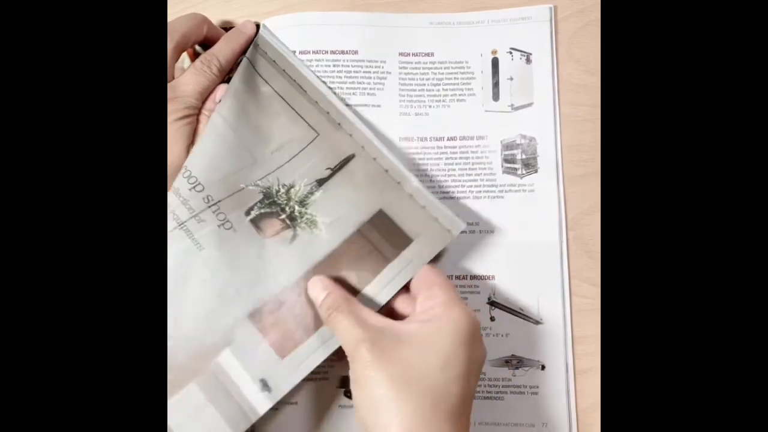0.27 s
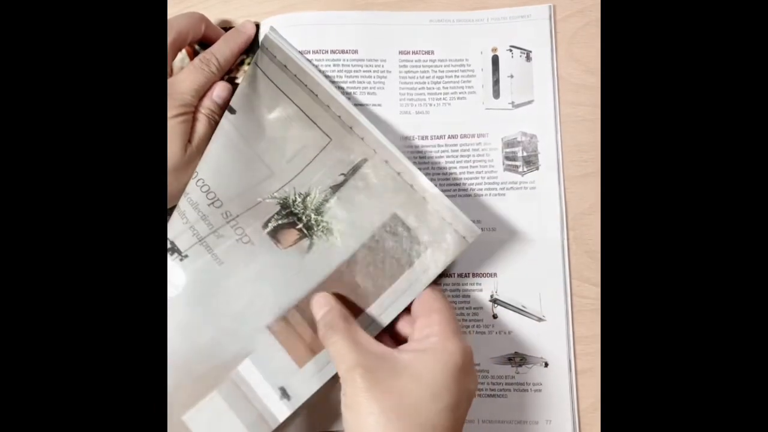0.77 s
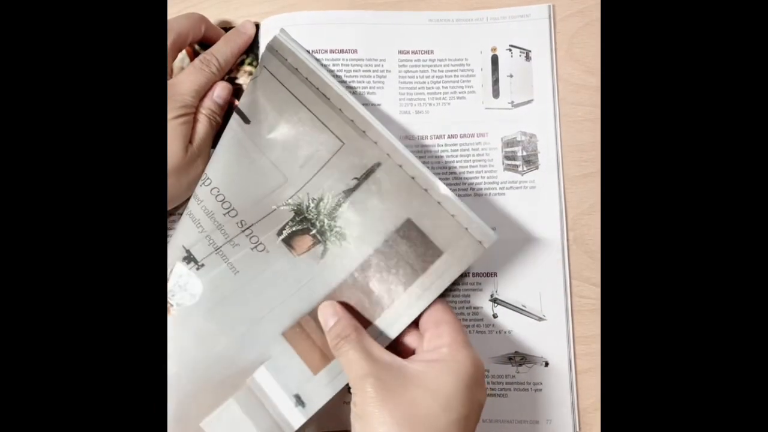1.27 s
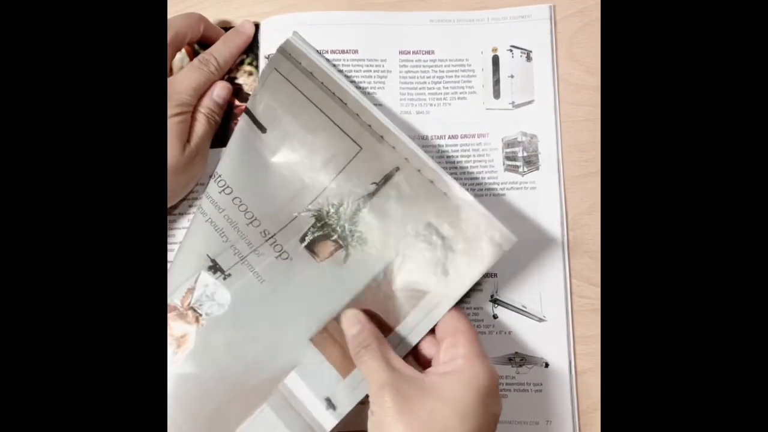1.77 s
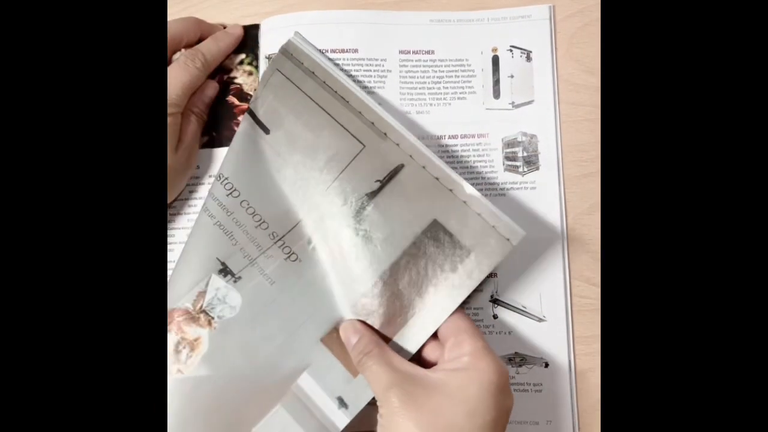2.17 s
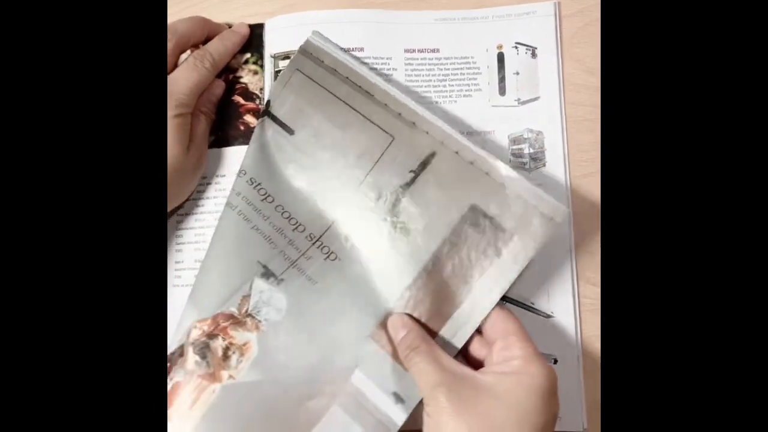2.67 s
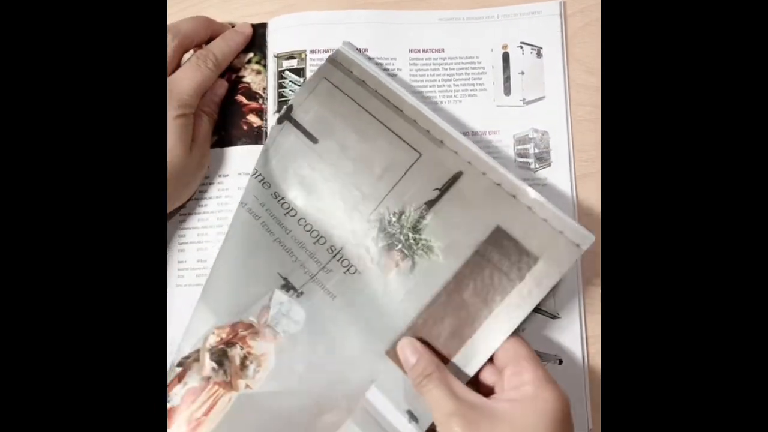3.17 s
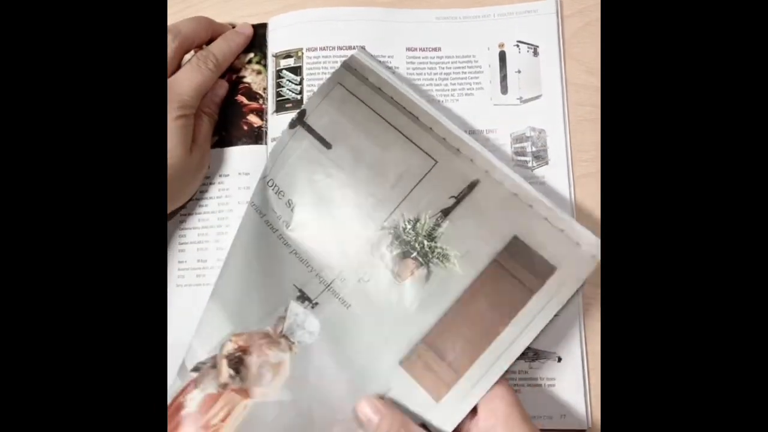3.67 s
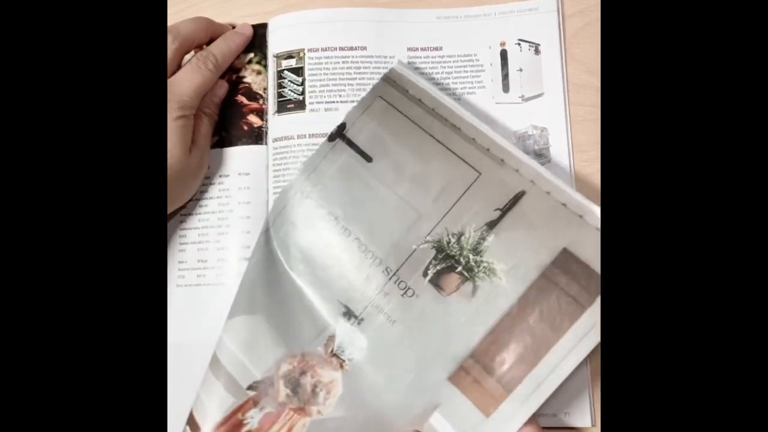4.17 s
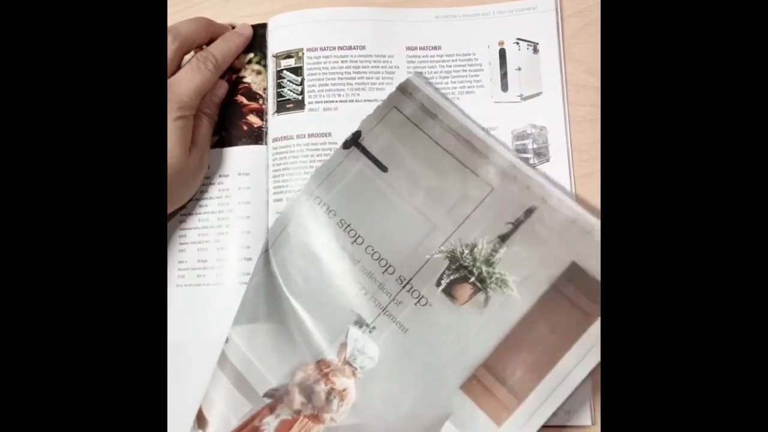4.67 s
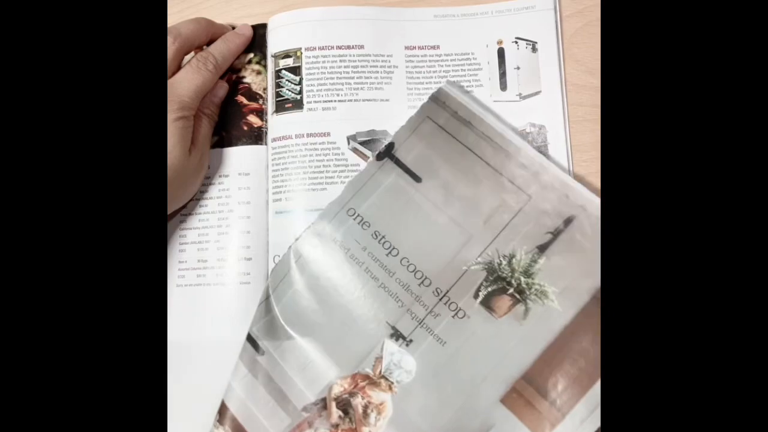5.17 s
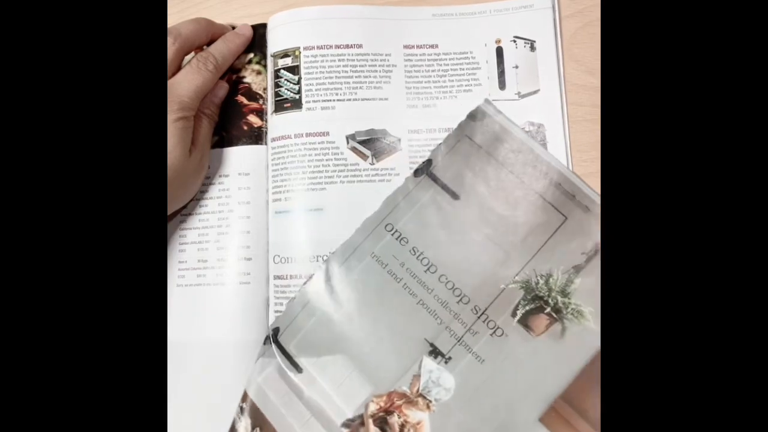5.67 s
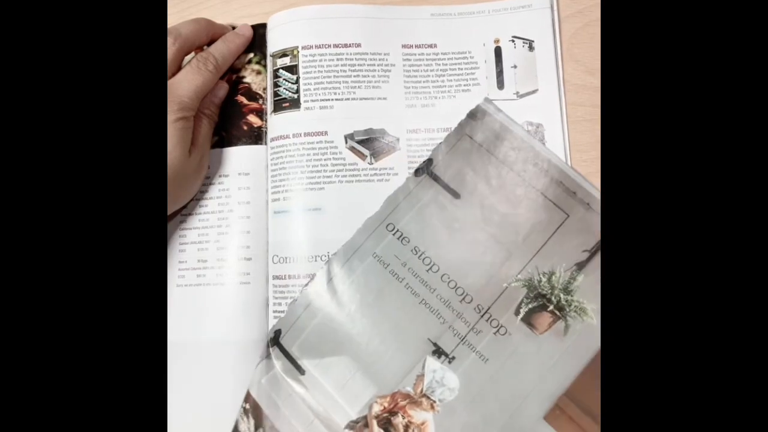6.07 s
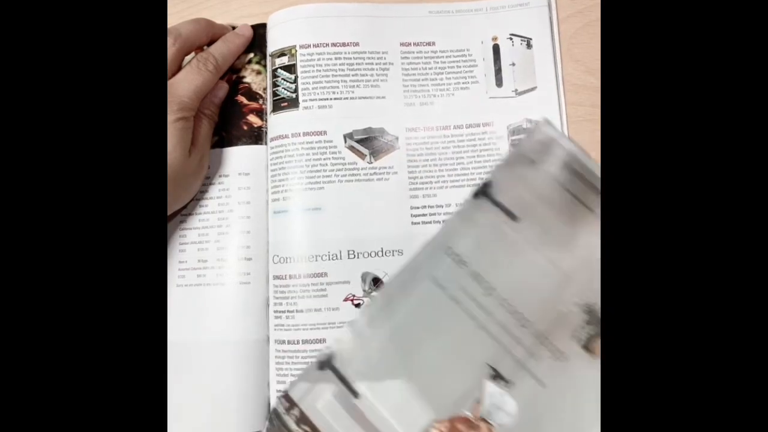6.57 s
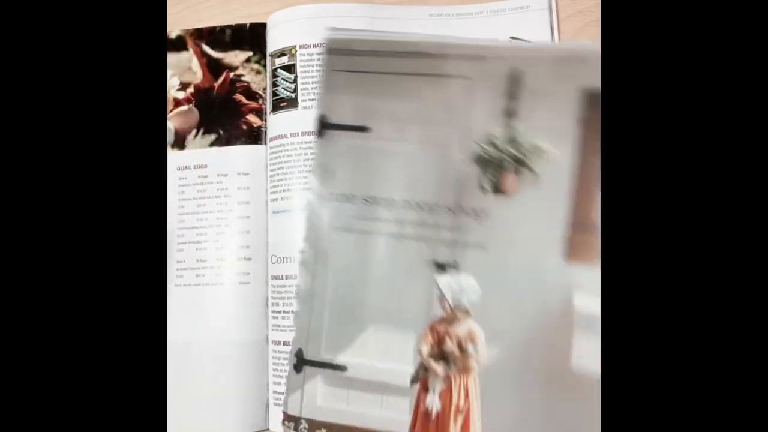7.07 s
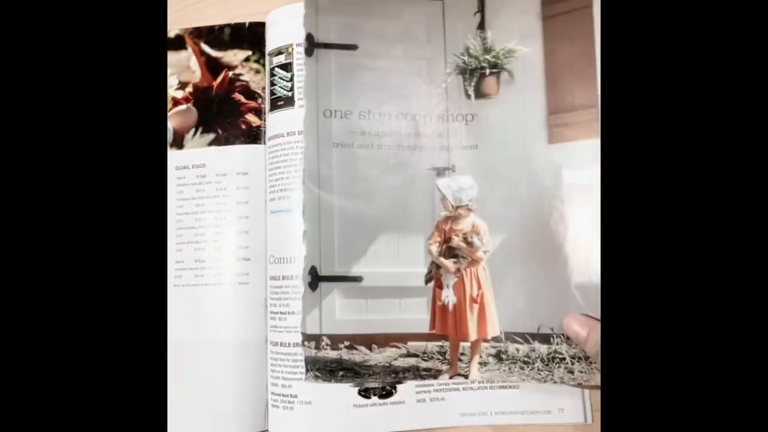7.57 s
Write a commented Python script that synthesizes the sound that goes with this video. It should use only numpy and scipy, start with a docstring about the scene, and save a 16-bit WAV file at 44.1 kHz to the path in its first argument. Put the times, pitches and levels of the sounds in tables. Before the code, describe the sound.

In a small quiet room, very close to the microphone, hands slowly tear a glossy page from a magazine on a wooden table. Short crackling rips come about twice a second, with dry snaps, ticks of buckling paper, soft flaps and grainy rubbing in between. Pulls start light and grow louder and brighter. The last rip frees the page, which then lands and glides to rest with a hollow papery brush.

```python
"""Hands bend, shift and nudge a magazine on a wooden table in a small, quiet room, heard close.
Then a glossy page is torn out along the spine in short pulls: each breaks a run of fibres, built from
crackles of tiny ringing bursts, with stronger snaps of whole bundles. Between pulls the page buckles with
ticks and low flaps, and slides over its neighbours with a grainy rub and hiss.
At last the freed page is laid down and glides to rest as a hollow, papery brush."""
import sys
import numpy as np
from scipy import signal
from scipy.fft import rfft, irfft
from scipy.io import wavfile
from scipy.ndimage import uniform_filter1d, map_coordinates

SR = 44100
rng = np.random.default_rng(int(sys.argv[2]) if len(sys.argv) > 2 else 0)


def store_pcm(level_fs):
    """Save levels as 16-bit WAV."""
    pcm = np.round(np.clip(level_fs, -1, 1) * 32767).astype(np.int16)
    wavfile.write(sys.argv[1], SR, np.atleast_2d(pcm).T)


N = 344862
TIME = np.arange(N) / SR

# The pulls along the spine. Each row: start in seconds, end in seconds, force in dB, swell from the middle
# to the end in dB, treble in dB, body of the sheet in dB; all levels before the trims of each layer.
PULLS = [(0.369, 0.499, -42.5, -1.5, 4, 4), (0.815, 0.95, -39.5, -1, 4, -2.5),
         (1.411, 1.526, -36.5, -4.5, -5, 2), (1.553, 1.595, -38, -7, -9, 3), (2.15, 2.246, -37, 4, -8, 5.5),
         (2.258, 2.345, -38, -3, 4, 8), (2.862, 3.072, -34, 2, 5, 2.5), (3.265, 3.412, -36, 9.5, 2, 2),
         (3.622, 3.748, -26.5, -1, 6, -3), (3.967, 4.079, -27, 1, 8.5, -3),
         (4.268, 4.373, -30, 5.5, 4.5, -2), (4.585, 4.743, -28.5, -0.5, 3, -1.5),
         (4.927, 5.073, -33, -6, 0.5, -1), (5.202, 5.34, -30, 9, 2.5, -4), (5.478, 5.577, -28, 6, 7.5, -2),
         (5.844, 5.931, -39.5, 5, 4.5, -7), (6.102, 6.234, -23.5, -3, 6, 3.5),
         (6.286, 6.329, -36.5, -10, -6, 0), (6.412, 6.53, -27, 14.5, 5, 3.5)]
# The sheet buckling as it is bent or put down. Each row: start in seconds, tick peak in dB and
# flap peak in dB, both before trim.
BUCKLE_EVENTS = [(0.071, -28, -54), (0.25, -46, -55), (0.6489, -28, -50.5), (0.776, -33, -51),
                 (1.0613, -33.5, -45), (1.1363, -25, -45.5), (1.694, -22.5, -49), (1.967, -52, -46),
                 (2.105, -22.5, -52.5), (2.717, -23.5, -47.5), (3.1406, -22, -48.5), (3.5, -24, -45.5),
                 (3.605, -26.5, -49), (3.8239, -21, -42.5), (3.909, -29, -45), (4.1697, -19.5, -41),
                 (4.4485, -22, -49.5), (4.7967, -23, -46), (4.8983, -24.5, -42), (5.1189, -25.5, -50.5),
                 (5.2054, -19, -39.5), (5.391, -23.5, -50.5), (5.466, -22.5, -41), (5.622, -26, -51.5),
                 (5.9311, -22.5, -40.5), (6.063, -29, -44), (6.095, -25, -44), (6.4078, -20.5, -36),
                 (6.592, -48, -42), (6.643, -49, -48), (6.722, -52, -49), (6.8449, -30, -39),
                 (7.289, -35, -43.5), (7.727, -42, -44)]
# Bright spectrum of breaking fibres. Each row: frequency in Hz, relative level in dB.
TEAR_COLOUR = [(150, -30), (500, -20.5), (950, -16), (1400, -2.5), (1900, -3), (2800, 0), (4400, -1),
               (7500, -2.5), (11500, -2.5), (16000, -10)]
# Low resonances of the whole shaken sheet. Each row: frequency in Hz, relative level in dB.
SHEET_COLOUR = [(150, -11), (370, 5), (490, -0.5), (680, 2), (1000, -16), (2000, -16)]

SLACK_S, CORNER_S = 2.7, 6  # the page hangs slack between these times; before and after, it is taut
SLIDE_ATTACK_S, SLIDE_RELEASE_S = 0.011, 0.028
TOP_HZ = 16000  # top of the spot tints and of the final low-pass


def undb(db):
    """Amplitude factor of a level in dB."""
    return 10 ** (np.asarray(db) / 20)


def unit(x):
    """Scale to rms 1."""
    return x / np.sqrt(np.mean(x ** 2) + 1e-18)


def add(out, s, sound):
    """Mix a sound in at s seconds."""
    i = max(int(s * SR), 0)
    out[i:i + len(sound)] += sound[:len(out) - i]


def peaking(x, db, size):
    """Scale so that the loudest stretch of size samples has this rms level."""
    return x * undb(db) / np.sqrt(uniform_filter1d(x ** 2, size=size).max())


def colour(x, points, size=2048):
    """Minimum-phase filter of unit energy through (Hz, dB) points."""
    hz, db = np.transpose(points)
    grid = np.maximum(np.fft.rfftfreq(size, 1 / SR), 1)
    cepstrum = irfft(np.log(undb(np.interp(np.log(grid), np.log(hz), db))))
    # folding the cepstrum forward makes the filter causal
    cepstrum[1:size // 2] *= 2
    cepstrum[size // 2 + 1:] = 0
    response = irfft(np.exp(rfft(cepstrum)))
    return signal.fftconvolve(x, response / np.linalg.norm(response))[:len(x)]


def tint(x, depth_db, count=22):
    """Random peaks and dips above the bass, since every spot on the sheet favours other frequencies."""
    hz = np.geomspace(700, TOP_HZ, count)
    levels_db = np.append(0, depth_db * rng.standard_normal(count - 1))
    return colour(x, np.column_stack([hz, levels_db]))


def walk(rate):
    """Random drift in straight lines between normal draws, rate of them a second."""
    knots = rng.standard_normal(N // 20)
    return np.interp(TIME * rate, np.arange(len(knots)), knots)


def ring(t60, rise_s=.0001, size=4096):
    """The crowded modes of a struck sheet: noise that builds up, then falls 60 dB in t60 seconds; unit energy."""
    t = np.arange(size) / SR
    rise = np.minimum(t / rise_s, 1) ** 2
    decay = np.exp(-np.log(1000) * np.maximum(t - rise_s, 0) / t60)
    burst = rng.standard_normal(size) * decay * rise
    return burst / np.linalg.norm(burst)


def crackle(rate, spread_db, t60, tint_db, count=60, size=1024):
    """Tiny breaks of uneven size, rate a second at random moments; their place and colour wander over the sheet."""
    spots = [tint(ring(t60, size=size), tint_db) for _ in range(count)]
    place = 5 * rng.random(N) + 14 * walk(14)
    sizes = undb(spread_db * np.clip(rng.standard_normal(N), -2, 2))
    out = np.zeros(N)
    for i in np.flatnonzero(rng.random(N) < rate / SR):
        add(out, TIME[i], sizes[i] * spots[int(place[i]) % count])
    return unit(out)


def crack(t60, rise_s, flutter_db, flutter_t60):
    """A quick avalanche of breaks and the weaker flutter it sends through the sheet."""
    return ring(t60, rise_s) + undb(flutter_db) * ring(flutter_t60, 2 * rise_s)


def taut(x, hz=4550, ring_db=-1):
    """A short stretch of page held taut between hand and spine adds a broad resonance."""
    return x + undb(ring_db) * signal.lfilter(*signal.iirpeak(hz, 3, fs=SR), x)


def freed_area():
    """Gain of the low body, rising steadily with time as the page comes free; 1 at mid-scene."""
    growth_db_per_s = 1.7
    return undb(growth_db_per_s * (TIME - TIME.mean()))


def room_air(level_db=-65.5):
    """Faint steady air of the room: noise filtered towards the lows."""
    # Each row: frequency in Hz, relative level in dB.
    air_colour = [(20, -16), (110, -22), (390, -12), (1900, -28.5), (16000, -50)]
    return undb(level_db) * colour(rng.standard_normal(N), air_colour, size=8192)


def room(x, wet_db=-17, delay_s=0.0046, treble_db=-7):
    """The walls answer with a short, slightly dull tail of decaying noise."""
    tail = ring(t60=.25, size=22050)
    tail = colour(tail, [(4000, 0), (14000, treble_db)])
    out = x.copy()
    add(out, delay_s, undb(wet_db) * signal.fftconvolve(x, tail)[:N])
    return out


def table_echo(x, lag_s=0.000974, echo_db=-10):
    """The table top mirrors the paper, a little dulled; the lag drifts at random and shifts the comb notches."""
    late = lag_s * (1 + .06 * walk(4))
    echo = signal.sosfiltfilt(signal.butter(1, 4500, fs=SR, output="sos"), x)
    return x + undb(echo_db) * map_coordinates(echo, [(TIME - late) * SR], order=3)


def table_handling(paper, nudge_db=0.0, rumble_db=-75, tug_db=-40, hz=54, swell_s=0.0096):
    """Nudges thud softly as swelling, dying low tones; a rumble grows with paper loudness and freed area."""
    # Hands nudging the magazine on the table. Each row: start in seconds, level in dB.
    nudges = [(0.208, -47), (1.909, -33.5), (1.954, -31.5), (2.286, -49), (2.462, -45), (3.916, -44),
              (6.464, -38)]
    # Low spectrum of thud noise and rumble. Each row: frequency in Hz, relative level in dB.
    handling_colour = [(25, -28), (52, 12.5), (130, 14.5), (400, -22)]
    out = np.zeros(N)
    t = TIME[:SR // 4]
    swell = t / swell_s * np.exp(1 - t / swell_s)  # reaches 1 at swell_s
    for s, db in nudges:
        grit = colour(rng.standard_normal(len(t)), handling_colour)
        thud = np.sin(2 * np.pi * hz * t) + 0.14 * grit
        add(out, s, undb(db + nudge_db) * thud * swell)
    tug = np.sqrt(np.abs(uniform_filter1d(np.abs(paper), size=8000)))
    rumble = colour(rng.standard_normal(N), handling_colour, size=8192)
    return out + rumble * (undb(rumble_db) + undb(tug_db) * tug * freed_area())


def gliding():
    """The whole loose sheet lands and brushes over the magazine: a coloured crackle under a drawn level."""
    # The landing and gliding to rest. Each row: time in seconds, level in dB.
    glide_level = [(7.289, -39), (7.34, -52), (7.46, -41), (7.55, -49), (7.82, -58.5)]
    # Hollow, papery spectrum. Each row: frequency in Hz, relative level in dB.
    glide_colour = [(230, -20), (400, 2.5), (520, -4), (770, 0), (920, -7.5), (1800, -11.5), (3000, -17),
                    (9000, -31)]
    brush = colour(crackle(rate=800, spread_db=2.5, t60=0.024, tint_db=2.2), glide_colour)
    return brush * undb(np.interp(TIME, *np.transpose(glide_level), left=-np.inf))


def stroke(start, end):
    """Envelope of one movement of the page: it speeds up, holds and dies away."""
    attack = np.clip((TIME - start) / SLIDE_ATTACK_S, 0, 1)
    return attack * np.exp(-np.clip((TIME - end) / SLIDE_RELEASE_S, 0, 20))


def movements():
    """Slides, drags and settling move the page: (start s, end s, rub dB, hiss dB), levels before trim."""
    # The hand shifts the page over its neighbours.
    # Each row: start in seconds, end in seconds, rub in dB, hiss in dB; both before trim.
    slides = [(0.18, 0.26, -73, -54.5), (1.67, 1.73, -49, -55), (1.84, 1.97, -52, -57.5),
              (2.3, 2.37, -51.5, -61), (2.49, 2.65, -52.5, -54), (2.745, 2.8, -50, -52),
              (3.16, 3.27, -50.5, -56), (3.9, 3.95, -50, -44.5), (4.19, 4.27, -45.5, -41),
              (4.79, 4.84, -49.5, -43.5), (4.9, 4.94, -44, -45), (5.78, 5.85, -51.5, -51.5),
              (6.285, 6.33, -37.5, -44.5), (6.74, 6.8, -53, -51), (6.92, 7.25, -65.5, -55)]
    drag_rub_db, drag_hiss_db = -17.5, -16  # a pull drags the page along; relative to the pull
    settle_rub_db, settle_hiss_db = -4, -9  # a buckled page settles; relative to its flap
    drags = [(start, end, db + body_db + drag_rub_db, db + drag_hiss_db)
             for start, end, db, _, _, body_db in PULLS]
    settles = [(s, s + SLIDE_ATTACK_S, flap_db + settle_rub_db, flap_db + settle_hiss_db)
               for s, _, flap_db in BUCKLE_EVENTS]
    return list(slides) + drags + settles


def sliding(rub_db=-2.0, hiss_db=-7.0, ticks_db=-4, catch_db=3.0, waver_db=-2.5):
    """Paper on paper catches and slips: a crinkly rub, a fine hiss and stray edge ticks of wavering level."""
    # Low, crinkly rub. Each row: frequency in Hz, relative level in dB.
    rub_colour = [(150, -12), (370, 0.5), (520, -5), (1000, -15), (1900, -9), (3000, -19), (7000, -46.5)]
    # Fine hiss. Each row: frequency in Hz, relative level in dB.
    hiss_colour = [(600, -21), (1500, 2), (2800, -3), (5000, -1), (16000, -12.5)]
    # the page is never quite still in the hand: a constant floor, before trim
    held_rub_db, held_hiss_db = -77, -59
    rub_gain, hiss_gain = undb(held_rub_db), undb(held_hiss_db)
    for start, end, rub_level, hiss_level in movements():
        speed = stroke(start, end)
        rub_gain = np.maximum(rub_gain, speed * undb(rub_level))
        hiss_gain = np.maximum(hiss_gain, speed * undb(hiss_level))
    catch = undb(catch_db * walk(40) + waver_db * walk(6.4))
    rub = colour(crackle(rate=500, spread_db=4.0, t60=0.018, tint_db=2), rub_colour)
    edge_ticks = crackle(rate=110, spread_db=7, t60=.003, tint_db=2.5)
    hiss = colour(rng.standard_normal(N) + undb(ticks_db) * edge_ticks, hiss_colour)
    return catch * (rub * rub_gain * undb(rub_db) + hiss * hiss_gain * undb(hiss_db))


def stray_ticks(gain_db=-9.5):
    """Single fibres and page edges catch and let go as short bursts, too light to shake the sheet."""
    # Each row: start in seconds, peak in dB before trim.
    releases = [(0.081, -36.5), (0.798, -39), (1.106, -31), (1.3247, -33), (1.364, -27.5), (1.8117, -30.5),
                (1.866, -32), (2.455, -31.5), (2.848, -30), (2.868, -24), (3.2617, -24.5), (3.438, -23),
                (4.5816, -13.5), (5.07, -23), (5.1407, -28.5), (5.453, -26.5), (6.756, -30), (7.111, -32)]
    out = np.zeros(N)
    for s, db in releases:
        tick = colour(tint(ring(t60=0.0069), 2), TEAR_COLOUR)
        add(out, s, peaking(tick, db + gain_db, size=44))
    return out


def buckles(tick_db=-11.5, body_db=0.0, dulling=0.23, usual_flap_db=-18):
    """The bent sheet pops into a new shape: a tick and a slower page flap; a relatively larger flap dulls the tick."""
    # Bright tick. Each row: frequency in Hz, relative level in dB.
    tick_colour = [(450, -18), (800, -18), (2100, 3), (5000, 2), (9500, -6), (16000, -21.5)]
    # Low flap of the page. Each row: frequency in Hz, relative level in dB.
    flap_colour = [(150, -6.5), (370, -7), (520, -3.5), (950, -12), (2100, -8), (8000, -30.5)]
    out = np.zeros(N)
    for s, db, flap_db in BUCKLE_EVENTS:
        tick = ring(t60=0.017, rise_s=0.000071)
        tick = colour(tint(tick, 3), tick_colour)
        excess_flap_db = flap_db - db - usual_flap_db
        tick = colour(tick, [(2500, 0), (9000, -dulling * excess_flap_db)])
        flap = colour(ring(t60=0.045, rise_s=0.0015), flap_colour)
        add(out, s, peaking(tick, db + tick_db, size=44))
        add(out, s, peaking(flap, flap_db + body_db, size=880))
    return out


def snaps(gain_db=-1.0, bass_db=-5, top_db=-7.5, top_ratio=3.2, jolt_db=-23, jolt_hz=3000, flutter_db=-6):
    """Fibre bundles let go at once with a dry crack; thicker ones sound lower and jolt the sheet more."""
    # The toughest bundles giving way. Each row: start in seconds, peak in dB before trim, centre in Hz.
    bundles = [(0.3845, -26, 5200), (0.8475, -18, 4000), (0.93, -24, 2980), (1.5417, -20.5, 4600),
               (1.564, -25.5, 4800), (2.166, -19, 3780), (2.2054, -15, 4570), (2.269, -16, 4100),
               (2.2914, -25, 4000), (2.3018, -26.5, 4000), (2.881, -24, 6000), (2.9173, -32, 6000),
               (2.9494, -19.5, 3940), (2.9738, -19.5, 4200), (2.9909, -21, 6000), (3.044, -22, 4000),
               (3.0734, -24.5, 3020), (3.393, -17, 6600), (3.6324, -20.5, 9200), (3.6459, -12.5, 8200),
               (3.6614, -16.5, 5500), (3.7243, -21, 6030), (3.9492, -20, 7500), (3.9979, -29, 7050),
               (4.0218, -19.5, 7000), (4.0617, -20.5, 6140), (4.276, -17, 2600), (4.356, -16.5, 8900),
               (4.5842, -21, 2160), (4.642, -23, 8000), (4.6615, -12, 10000), (4.6672, -8, 4870),
               (4.6803, -11.5, 5500), (4.7065, -14, 3720), (4.7105, -6, 2360), (4.9699, -24.5, 5000),
               (4.984, -23.5, 5000), (5.2731, -25, 6000), (5.3113, -16.5, 7000), (5.3229, -15, 4000),
               (5.4924, -21.5, 2500), (5.5147, -14.5, 3200), (6.1474, -28, 4500), (6.1693, -11.5, 3800),
               (6.202, -12.5, 9000), (6.4523, -15.5, 8600), (6.465, -14, 6000), (6.5094, -18, 4500),
               (6.5218, -15.5, 5000), (6.5284, -14.5, 4600)]
    out = np.zeros(N)
    for s, db, hz in bundles:
        snap = tint(crack(t60=.006, rise_s=.0007, flutter_db=flutter_db, flutter_t60=.035), 2.5)
        snap = colour(snap, TEAR_COLOUR)
        snap = colour(snap, [(hz / 6, bass_db), (hz, 0), (hz * top_ratio, top_db)])
        snap = taut(snap) if s < SLACK_S else snap
        jolt = colour(ring(t60=.12), SHEET_COLOUR)
        add(out, s, peaking(snap, db + gain_db, size=44))
        # jolt_db holds for a bundle centred on jolt_hz
        add(out, s, peaking(jolt, db + jolt_db, size=440) * jolt_hz / hz)
    return out


def tearing(gain_db=0.0, rise_s=0.011, fall_s=0.0063, treble_db=-1.0, sheet_db=-31):
    """The tear front runs in fits through the fibres while each pull lasts: dense crackle over a shaken sheet."""
    fibres_per_s, usual_pull_db = 1400, -29.5  # a harder pull breaks more fibres a second
    pull_arch_db = 8  # from SLACK_S on, a pull is this much weaker at its ends than in its middle
    fits = undb(4.3 * np.minimum(walk(90), 1))
    pull_db = np.interp(TIME, [(p[0] + p[1]) / 2 for p in PULLS], [p[2] for p in PULLS])
    rate = fibres_per_s * undb((pull_db - usual_pull_db) / 2)
    breaks = crackle(rate=rate, spread_db=6.8, t60=.004, tint_db=2.5)
    fibres = fits * (breaks + undb(-15) * rng.standard_normal(N))
    # the brittle gloss coating cracks in sparser, sharper clicks
    coating = undb(-5) * crackle(rate=140, spread_db=2.5, t60=.0018, tint_db=2)
    fibres = colour(fibres + coating, TEAR_COLOUR)
    treble = signal.sosfiltfilt(signal.butter(2, 7000, "high", fs=SR, output="sos"), fibres)
    fibres = np.where((TIME < SLACK_S) | (TIME > CORNER_S), taut(fibres), fibres)
    # the whole sheet is shaken too: a soft low body that grows only half as fast (in dB) as the force
    sheet = unit(colour(rng.standard_normal(N) * fits, SHEET_COLOUR)) * freed_area()
    out = np.zeros(N)
    for start, end, db, swell_db, bright_db, body_db in PULLS:
        i, j = int(start * SR), int((end + fall_s) * SR)
        t = TIME[i:j]
        run = fibres[i:j] + (undb(bright_db + treble_db) - 1) * treble[i:j]
        # even out the loudness of the crackle before the force shapes it
        run = run / np.sqrt(uniform_filter1d(run ** 2, size=1300) + 1e-12)
        along = np.interp(t, [start, end], [-1, 1])
        force = db + swell_db * along - pull_arch_db * (start > SLACK_S) * along ** 2
        gate = np.clip((t - start) / rise_s, 0, 1) * np.clip((end + fall_s - t) / fall_s, 0, 1)
        body = sheet[i:j] * undb(force / 2 + sheet_db + body_db)
        add(out, start, gate * (run * undb(force + gain_db) + body))
    return out


def scene():
    """Paper and table in the room, over its faint steady air."""
    page = tearing() + snaps() + buckles() + stray_ticks() + sliding()
    paper = room(table_echo(page) + gliding())
    return (paper + table_handling(paper) + room_air())[None]


def record(dry, low_cut_hz=36):
    """Thin the deepest bass, round the loudest peaks and cut the top."""
    thin = signal.sosfilt(signal.butter(3, low_cut_hz, "high", fs=SR, output="sos"), dry)
    rounded = np.tanh(thin)
    return signal.sosfilt(signal.ellip(10, .2, 80, TOP_HZ, fs=SR, output="sos"), rounded)


dry = scene()
out = record(dry)
store_pcm(out)
```